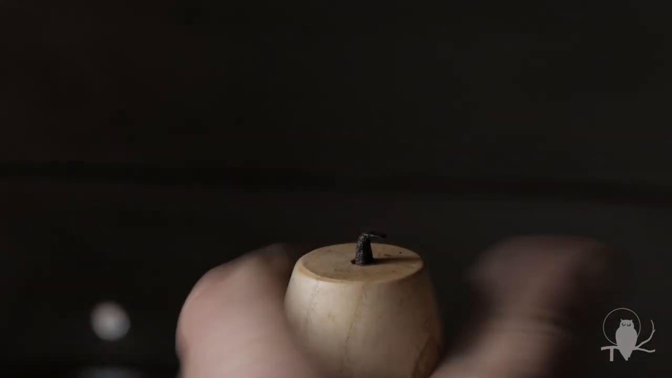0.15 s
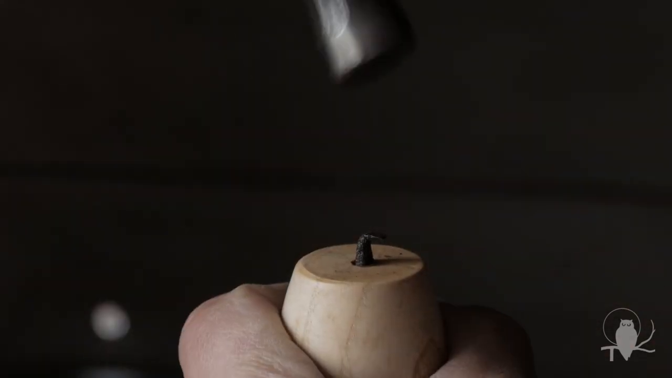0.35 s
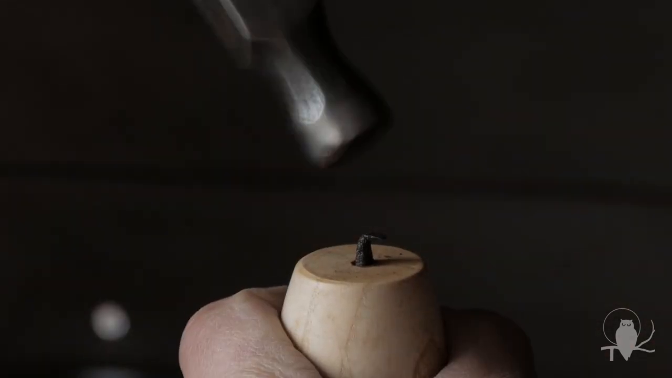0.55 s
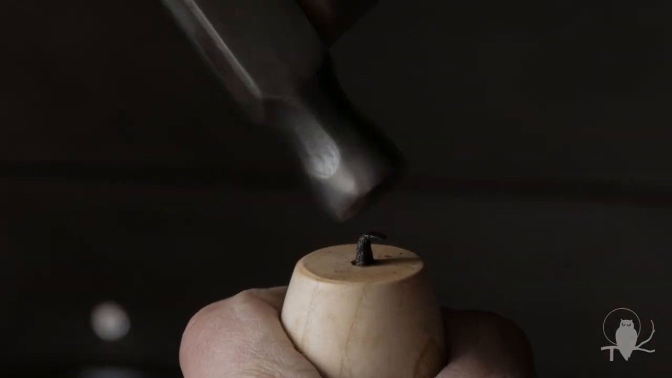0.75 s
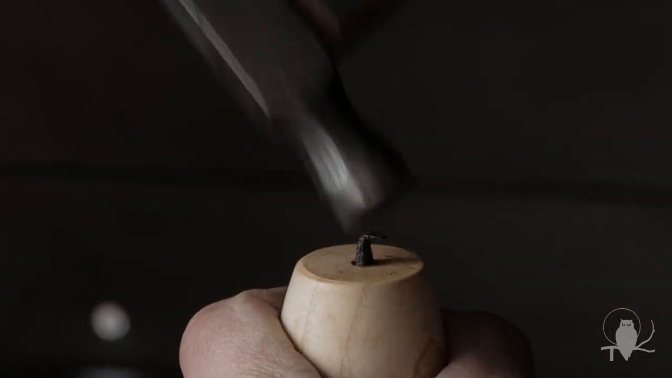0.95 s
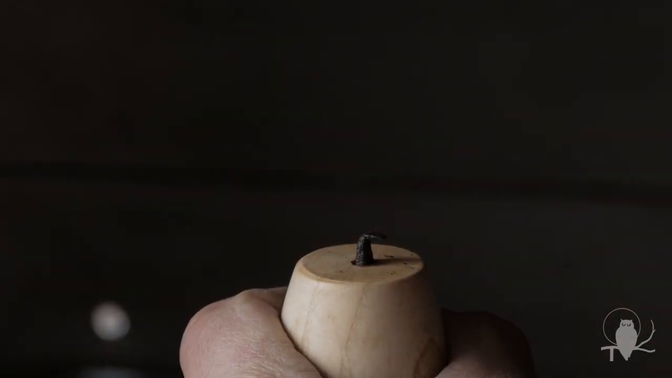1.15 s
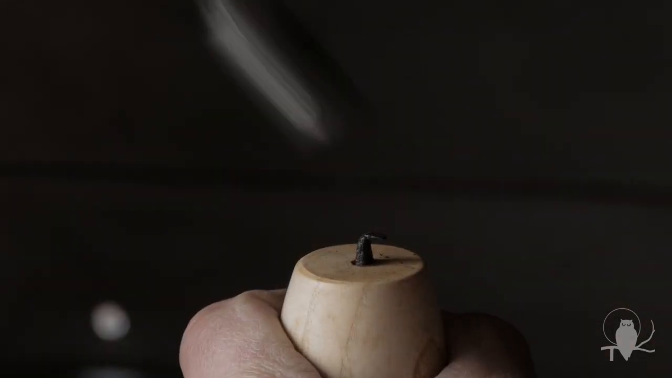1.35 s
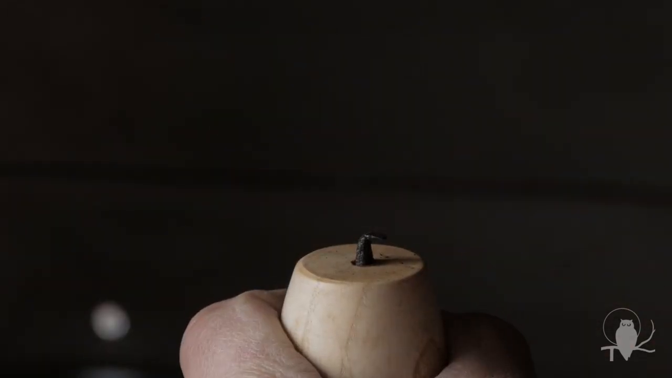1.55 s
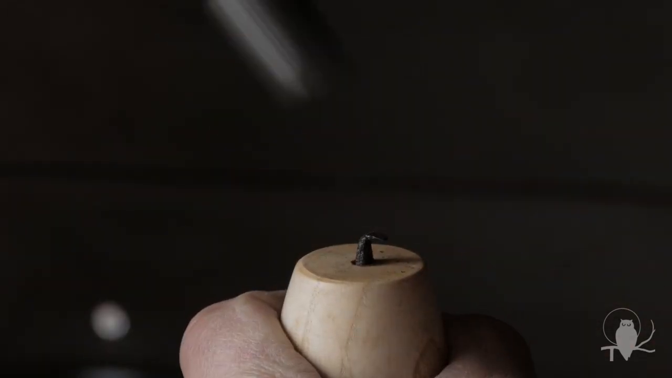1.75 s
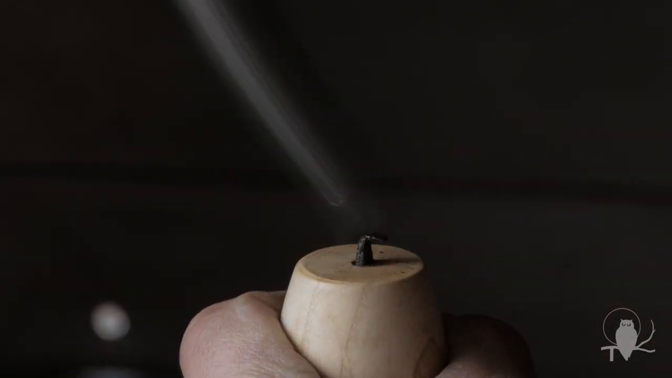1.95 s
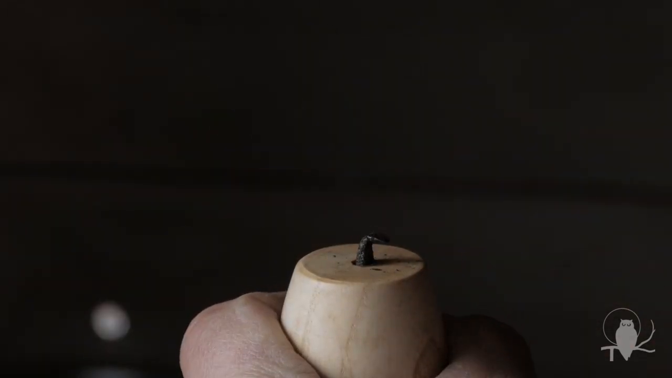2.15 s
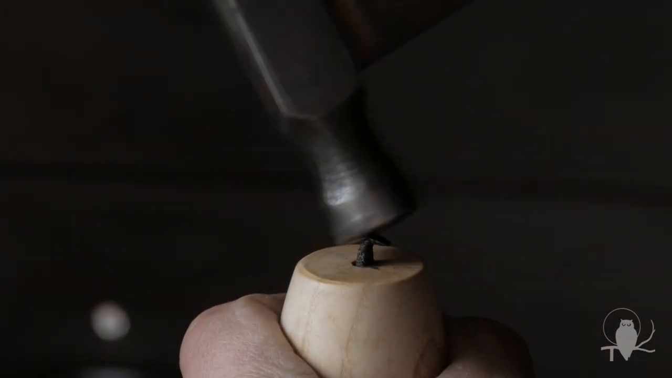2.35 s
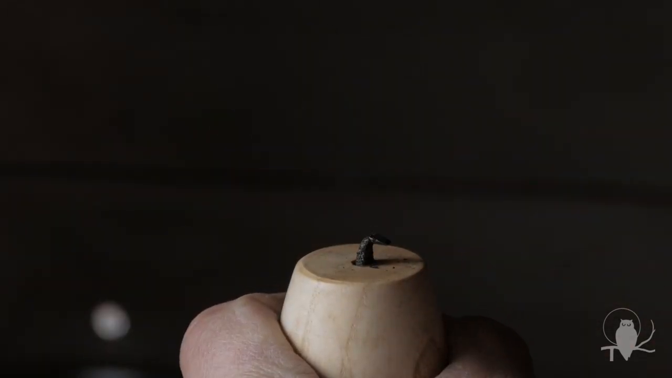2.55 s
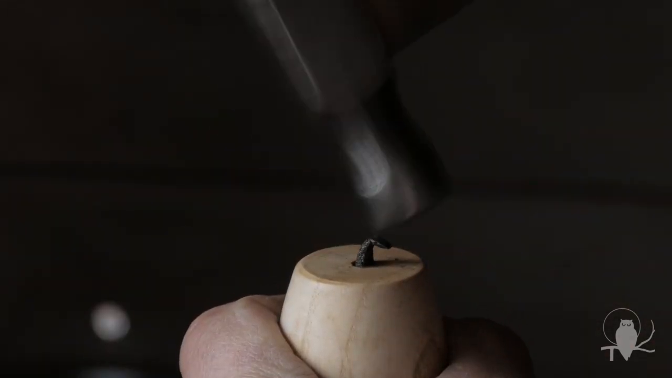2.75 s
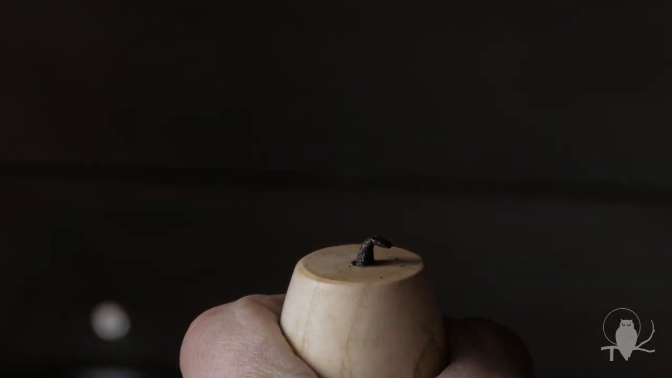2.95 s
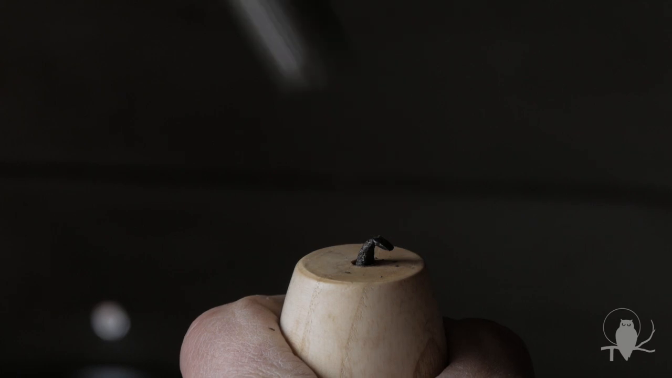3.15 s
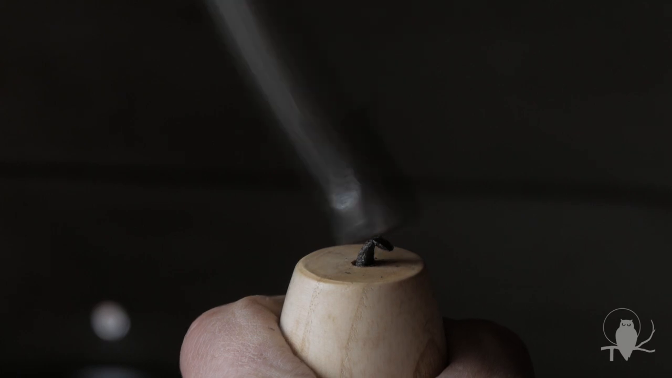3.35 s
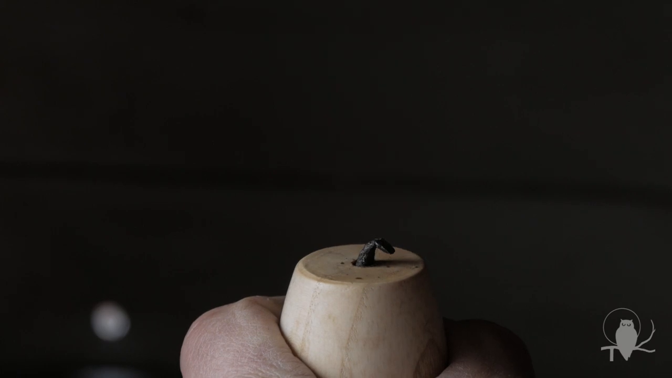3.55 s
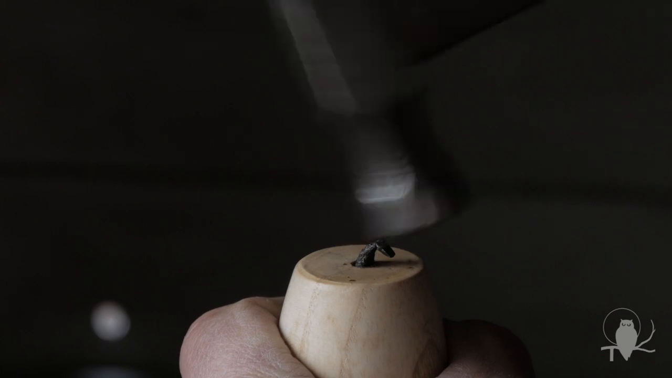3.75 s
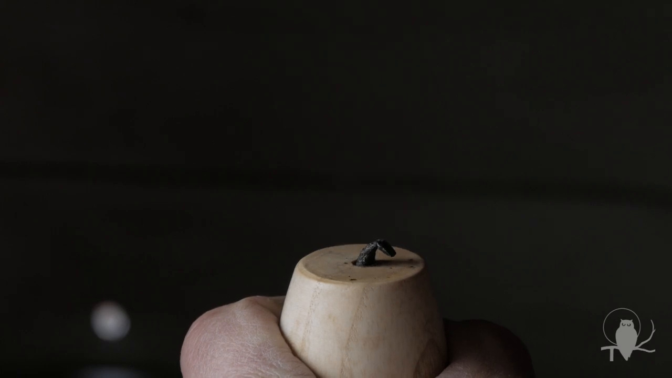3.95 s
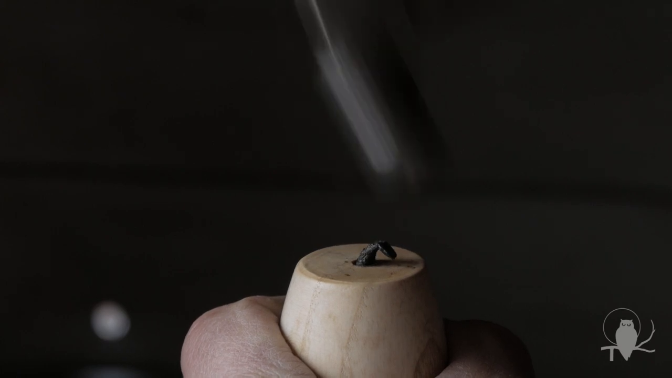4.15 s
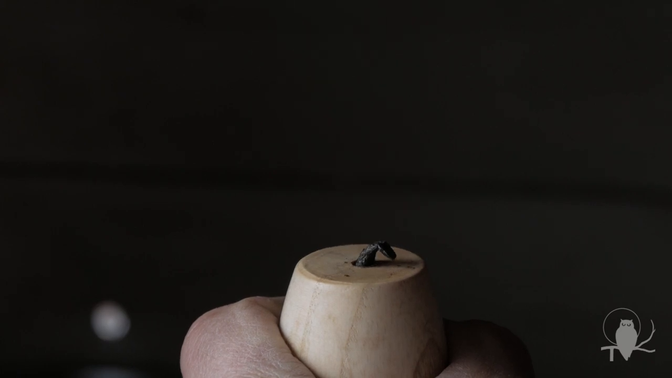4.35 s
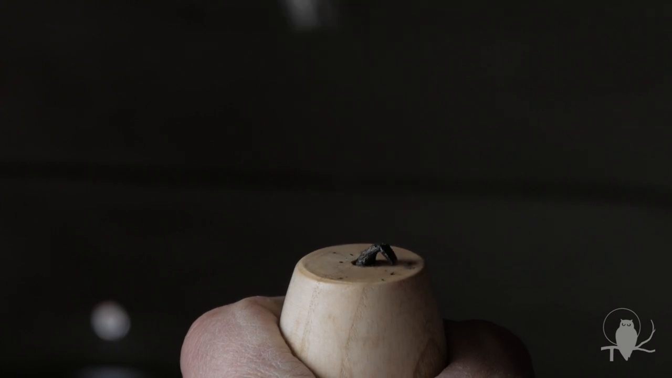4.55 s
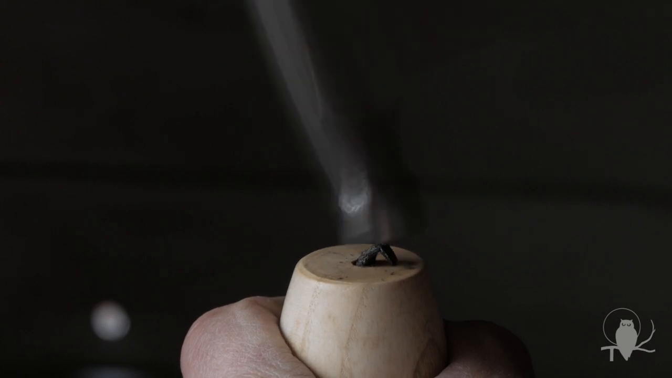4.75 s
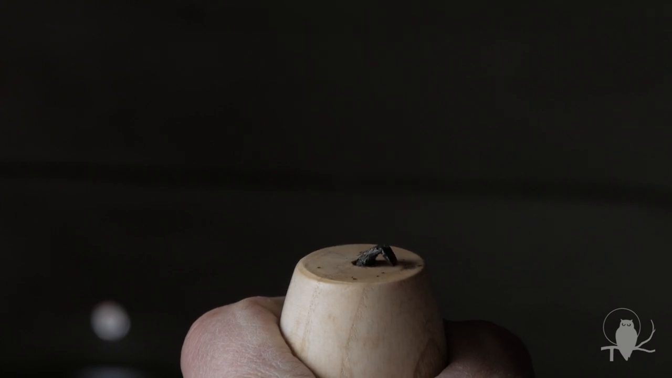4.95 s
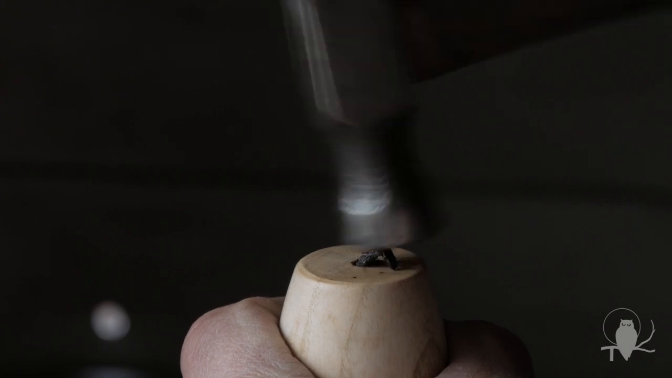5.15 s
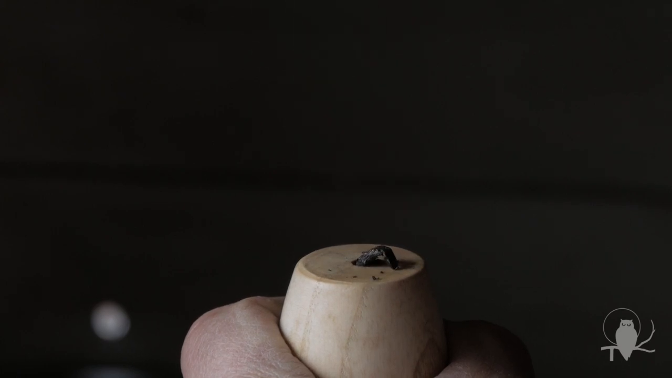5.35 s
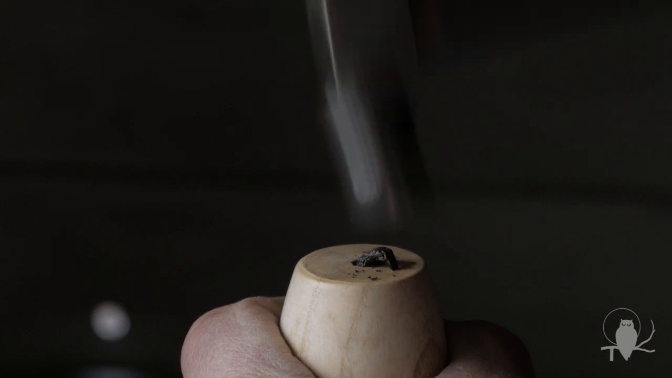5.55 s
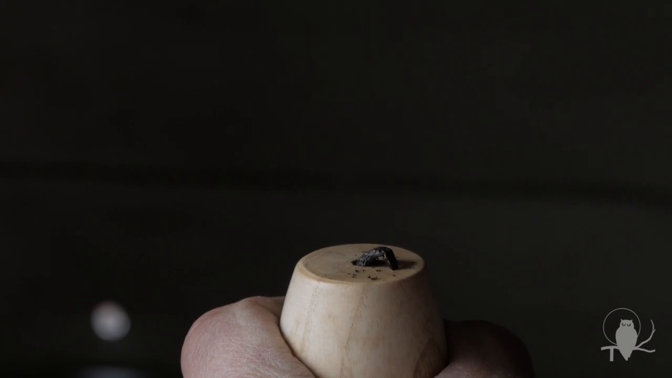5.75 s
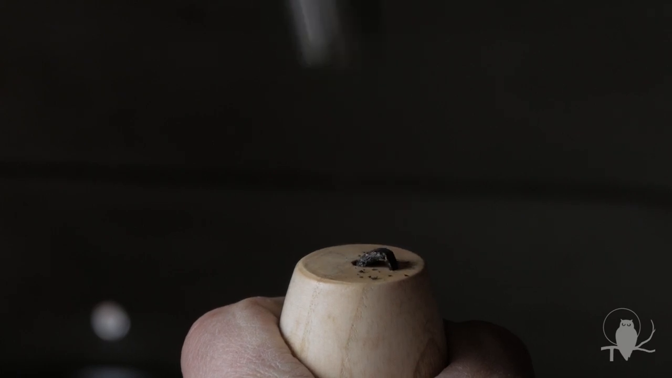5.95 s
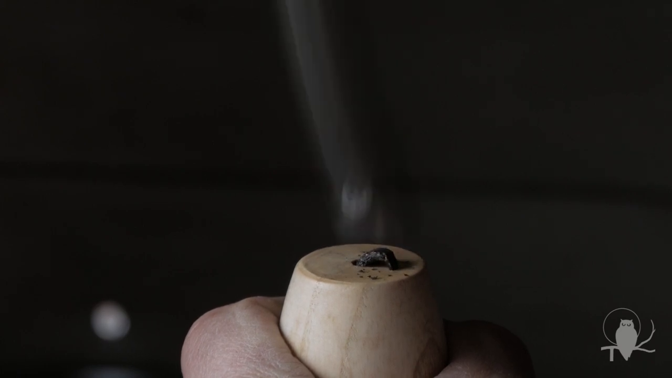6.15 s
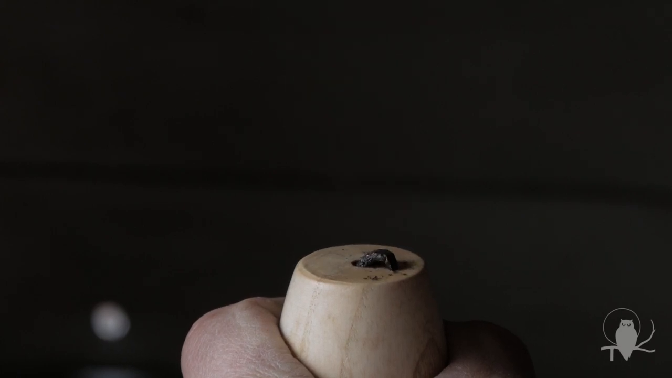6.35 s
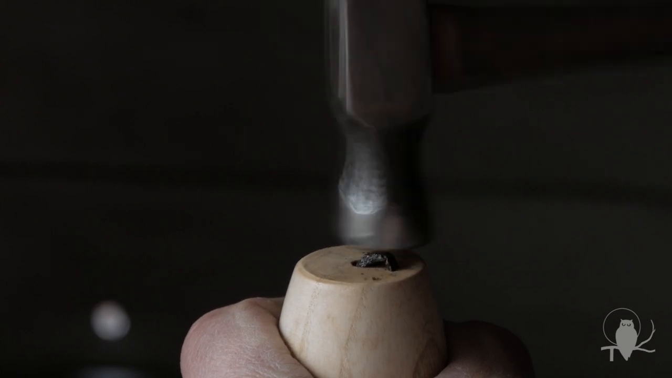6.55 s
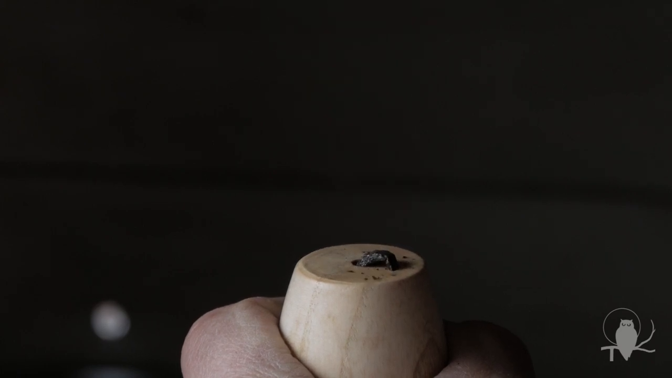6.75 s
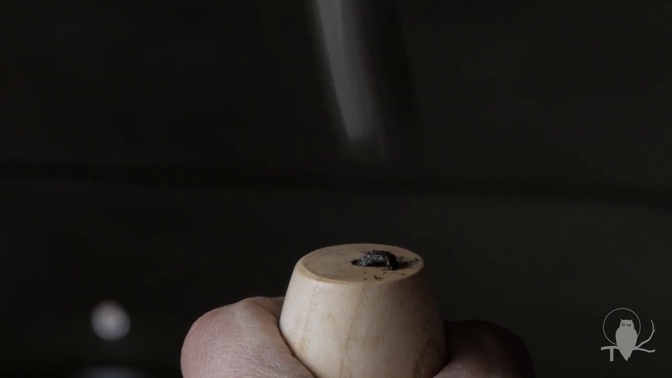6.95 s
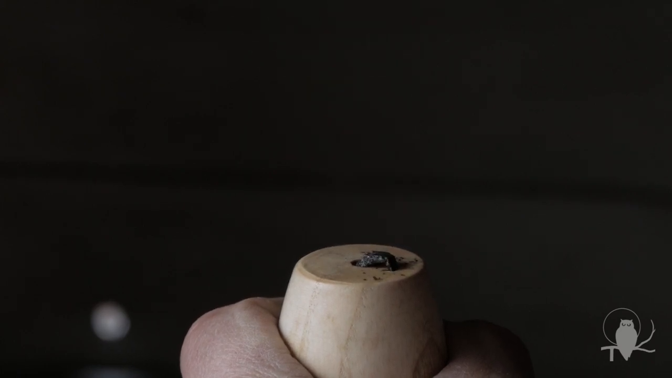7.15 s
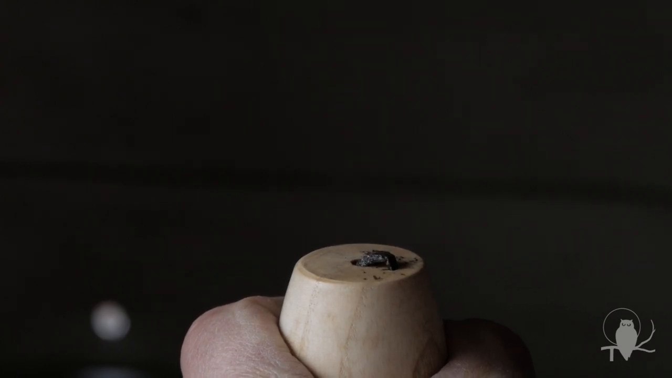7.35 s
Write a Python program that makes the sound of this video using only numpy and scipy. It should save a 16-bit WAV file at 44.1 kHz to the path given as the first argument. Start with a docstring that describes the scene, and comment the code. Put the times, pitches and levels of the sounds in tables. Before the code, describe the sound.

A wooden handle settles on a bench with a soft bump. Then a small hammer taps the steel tang poking through it, about three times a second, each blow a woody knock with a brief metallic ring. The taps slowly change tone as the tang flattens. They sound close, with short echoes from the walls of a small workshop, while birds whistle faintly outside over a low room hum.

```python
"""Hammering in a small workshop

A small hammer flattens a steel tang, the end of a tool that pokes through its wooden handle.
Every blow shakes the same steel, handle and bench and echoes off the same walls, so the taps
sound alike and change slowly as the tang flattens. Behind them are soft bumps, ticks and a rustle,
birds whistling faintly outside, and a low room hum."""
import sys
import numpy as np
from scipy import signal
from scipy.fft import rfft, irfft, next_fast_len
from scipy.io import wavfile
from scipy.ndimage import map_coordinates

SR = 44100
rng = np.random.default_rng(int(sys.argv[2]) if len(sys.argv) > 2 else 0)


def generate_wav(sig):
    """Save sig (samples, or channels by samples) to the path in sys.argv[1] as 16-bit PCM at SR."""
    pcm = np.round(np.clip(np.atleast_2d(sig).T, -1, 1) * 32767).astype(np.int16)
    wavfile.write(sys.argv[1], SR, pcm)


N = 326340

# Hammer blows (time [s], strength [dB], how flat it lands [0-1], sharpness [dB], thump [dB])
BLOWS = [(0.9254, -37, 0.71, -11.5, 3), (1.256, -26.5, 0.09, -5.5, 0), (1.6331, -25, 0, -4, 0.5),
         (1.9804, -25.5, 0, -0.5, 1), (2.3399, -25, 0.02, -1, -2.5), (2.6882, -23.5, 0, -2, -4.5),
         (3.0274, -24.5, 0.01, 0.5, -1.5), (3.3708, -24.5, 0, 0.5, -4), (3.7115, -26.5, 0.1, 1.5, -1),
         (4.066, -26.5, 0.21, 0.9, -2), (4.4133, -26, 0.2, 1.5, 1), (4.7684, -27.5, 0.5, 2, -3),
         (5.1272, -27, 0.6, -1.5, -4.5), (5.486, -28, 0.85, 0, -2), (5.8255, -28, 0.85, 0, -7),
         (6.1751, -27.5, 0.99, 3, -7.5), (6.5287, -26, 1, 2.5, -13), (6.8634, -25, 0.92, 2, -13.5)]
# The tone of a blow on the tip, and of a flat blow (frequency [Hz], boost [dB])
TIP_TONE = [(92, 5.5), (135, 1.5), (230, 1.5), (520, 6), (950, -1.5), (1400, -7.5), (2050, 5.5),
            (2350, 0.5), (2800, 2.5), (3800, -1.5), (9000, -6)]
FLAT_TONE = [(92, 6), (135, 1), (230, 8), (520, 7.5), (950, 4), (1400, 10), (2050, 2), (2350, 6),
             (2800, -1.5), (3800, -0.5), (9000, -8)]
# Where sharpness and bench thump change the tone (frequency [Hz], share [0-1])
SHARPNESS = [(1400, 0.0076), (2100, 0.46), (3800, .8), (9000, 1)]
THUMP = [(92, 0), (135, 0.88), (230, 0), (520, 0)]
def hammer():
    """Each blow rings wood and steel and stirs echoes; how it lands sets the tone."""
    out, t = np.zeros(N), np.arange(SR * 6 // 10) / SR
    echo_patterns = rng.standard_normal((2, len(t)))
    for start, db, flat, sharp_db, thump_db in BLOWS:
        early, late = wall_echoes(t, start, echo_patterns)
        tone_db = lambda hz: ((1 - flat) * along(TIP_TONE, hz) + flat * along(FLAT_TONE, hz)
                              + sharp_db * along(SHARPNESS, hz) + thump_db * along(THUMP, hz))
        tap = filtered(early + wood_ring(t) + tang_ring(t, flat), lambda hz: amp(tone_db(hz)))
        tap *= 1 - np.exp(-(t / .0021) ** 2)  # the soft tang gives way before it rings
        add(tap, .022, handle_bounce(tap, start))
        blow = amp(db) * (tap + late + head_ring(t, flat))
        add(out, start - .0017, blow)  # contact begins just before the sound peaks
    return out


# The notes of the bench, floor and handle (frequency [Hz])
WOOD_HZ = [93, 110, 131, 150, 168, 192, 208, 231, 252, 277, 298, 354, 390, 417, 456, 480, 526, 612, 654,
           692, 734, 822, 848, 892, 962, 1035, 1074, 1125, 1175]
# How each of them rings (level [dB], fade time [s])
WOOD_RINGS = [(1.5, 0.31), (-6, 0.24), (4.5, 0.38), (-3.5, 0.36), (-11, 0.61), (-5, .25), (1.5, 0.21),
              (-8.5, 0.027), (-7, 0.36), (-8, 0.2), (-5, .2), (-8, 0.12), (-12, 0.071), (-13, 0.062),
              (1, 0.12), (-9.5, 0.18), (-15, 0.23), (1, 0.12), (-8, 0.15), (-7.5, 0.03), (-23.5, 0.05),
              (-3.5, 0.081), (-2, 0.12), (-40, 0.16), (-19.5, 0.039), (-15.5, 0.085), (-11.5, 0.24),
              (-17, 0.16), (-19, 0.088)]
def wood_ring(t):
    """The wood shakes at many notes at once; the low ones come from the big boards and floor."""
    notes = np.c_[WOOD_HZ, WOOD_RINGS]
    is_low = notes[:, 0] < 330
    low = amp(-11) * ringing(notes[is_low], t, spread_db=2.4, rise=1.3, flip=0.95, lag=3.2)
    high = amp(-9) * ringing(notes[~is_low], t, spread_db=1, rise=3, flip=0.97)
    return low + high


# The notes of the tang and the top of the handle (frequency [Hz])
TANG_HZ = [1340, 1432, 1600, 1722, 1871, 1954, 1990, 2040, 2078, 2203, 2290, 2420, 2492, 2640, 2778, 2935,
           3112, 3380, 3590, 3925, 4247, 4440, 4830, 5040]
# How each of them rings (level [dB], fade time [s])
TANG_RINGS = [(-10, 0.14), (-12.5, 0.11), (-23, 0.037), (-13.5, 0.05), (-6.5, 0.13), (-4.5, 0.14),
              (-3.5, 0.086), (1, 0.046), (-6, 0.067), (-0.5, 0.071), (-3, 0.041), (-9.5, 0.041),
              (-20, 0.05), (-7.5, 0.068), (-7, 0.13), (-6.5, 0.11), (-16, 0.023), (-8.5, 0.11),
              (-18, 0.053), (-4, 0.081), (-7, 0.051), (-5.5, 0.015), (-11, 0.055), (-10, 0.12)]
def tang_ring(t, flat):
    """The struck steel rings; a hammer that lands flat cuts the upper notes short."""
    notes = np.c_[TANG_HZ, TANG_RINGS]
    is_upper = notes[:, 0] > 1500
    notes[:, 2] *= 1 - .45 * flat * is_upper
    return amp(-10.5 + 0.5 * flat) * ringing(notes, t, spread_db=2, rise=3.5, flip=-0.989)


# The hammer head's one high note (frequency [Hz], level [dB], fade time [s])
HEAD_NOTE = [(8856, 0, .14)]
def head_ring(t, flat):
    """The head rings out once it lands flat enough."""
    level_db = np.interp(flat, (.5, .75), (-52, -29))
    return amp(level_db) * ringing(HEAD_NOTE, t, spread_db=-4, rise=17, flip=1)


def handle_bounce(tap, start):
    """The handle jumps and lands with a thinner tap, louder once the tang is bent down."""
    bent_down_s, centre_hz, width_hz = 5.3, 1900, 1500
    band = lambda hz: 1j * hz * width_hz / (centre_hz ** 2 - hz ** 2 + 1j * hz * width_hz)
    return amp(-5 if start > bent_down_s else -22) * filtered(tap, band)


# The tone of the first echoes, and of the late ones (frequency [Hz], level [dB])
EARLY_TONE = [(60, -47), (150, -22.5), (350, -28), (600, -18), (1000, -16.5), (1330, -17), (1800, -18),
              (2100, -13.5), (2820, -16), (4950, -18.5), (5600, -23), (6300, -34), (8290, -28),
              (14600, -32), (16400, -47.5)]
LATE_TONE = [(60, -77), (105, -17), (300, -23), (600, -27), (1100, -36.5), (2000, -36), (5000, -46.5),
             (7000, -73), (16000, -86.5)]
# How long the first echoes last (frequency [Hz], fade time [s])
EARLY_FADE = [(60, 1), (160, 0.59), (420, 0.082), (1100, 0.12), (2900, 0.098), (7700, 0.093),
              (14000, 0.094)]
# How much of them is new at each blow (frequency [Hz], share [0-1])
NEW_SHARE = [(100, 0), (700, 0.35), (3000, 0), (9000, 0.1)]
def wall_echoes(t, start, patterns):
    """The walls answer with a quick knock, then a softer wash of late echoes."""
    turn = 0.15 * start  # the contact point wanders, and the echo pattern with it
    pattern = np.cos(turn) * patterns[0] + np.sin(turn) * patterns[1]
    kept = filtered(pattern, lambda hz: np.sqrt(1 - along(NEW_SHARE, hz)))
    new = filtered(noise(t), lambda hz: np.sqrt(along(NEW_SHARE, hz)))
    early = fading(kept + new, EARLY_TONE, EARLY_FADE) * (1 - np.exp(-t / 0.00043))
    late = fading(noise(t), LATE_TONE, [(100, 1.0), (3000, 0.36)]) * (1 - np.exp(-t / 0.015))
    return amp(-3) * early, amp(-22.5) * late


# Soft bumps, and small dry ticks (time [s], level [dB])
BUMPS = [(.002, -42), (.02, -41.5), (.036, -58)]
TICKS = [(3.908, -69.5), (6.441, -83)]
# The dull tone of a bump (frequency [Hz], level [dB])
BUMP_TONE = [(35, -56), (60, -22), (191, -0.5), (302, -16.5), (569, -1), (715, -14.5), (981, -16.5),
             (1810, -34.5), (4000, -46), (5200, -79), (8800, -120)]
def bumps_and_ticks():
    """The handle settles on the bench, wood on wood; later come two faint ticks."""
    out, t = np.zeros(N), np.arange(SR // 4) / SR
    soft_landing = 1 - np.exp(-(t / .004) ** 2)
    for start, db in BUMPS:
        bump = fading(noise(t), BUMP_TONE, [(100, .25), (600, .15), (3000, .1)])
        add(out, start, amp(db) * bump * soft_landing)
    tick_tone = [(600, -16), (2000, 6.5), (6000, -8), (12000, -22), (14000, -43)]
    for start, db in TICKS:
        add(out, start, amp(db - 3) * fading(noise(t), tick_tone, [(1000, 0.13)]))
    return out


# How loud the rustle is (time [s], level [dB])
RUSTLE_LEVEL = [(0, -86), (.2, -89), (.3, -110), (7.05, -110), (7.2, -86.5), (7.4, -87)]
# The tone of cloth (frequency [Hz], level [dB])
CLOTH_TONE = [(1500, -35.5), (3500, -6.5), (5500, -16), (7000, -24), (12500, -25), (14000, -49)]
def rustle(t):
    """A faint, grainy hiss of cloth at the start and the end."""
    grain = amp(1.8 * wobble(400, np.linspace(0, 399, N)))
    cloth = unit(grain * shaped(noise(t), CLOTH_TONE))
    return amp(along(RUSTLE_LEVEL, t, warp=np.asarray)) * cloth


# Bird whistles (time [s], length [s], first pitch [Hz], last pitch [Hz], bend in the middle [Hz],
# first level [dB], last level [dB], pitch flutter [Hz])
WHISTLES = [(0.022, 0.11, 2090, 2165, 27, -68, -71, 16), (.13, 0.094, 2165, 2165, 0, -82, -86, 13),
            (.185, .055, 2860, 3400, 550, -63, -82, 66), (.22, .065, 2530, 2720, 107, -61, -84, 30),
            (.28, .035, 2700, 2430, 0, -68, -77.5, 44), (.32, .05, 2560, 2450, 1, -72, -74, 37),
            (.52, .24, 1977, 1690, -110, -76.5, -94, 35), (.8, .11, 2370, 2280, 7, -78, -91, 61),
            (1.066, 0.19, 2660, 2780, 230, -79, -75.5, 62), (1.089, 0.21, 1960, 2040, 31, -87, -79, 45),
            (1.3, .24, 2346, 2126, -86, -70, -78.5, 14), (1.55, .08, 2165, 2110, 0.5, -85, -81.5, 21),
            (2.418, 0.11, 3960, 3650, 88, -74, -81, 68), (2.498, 0.093, 3790, 3900, 33, -78, -85, 35),
            (2.6, 0.073, 6600, 5950, -1, -102, -95, 56), (2.828, .13, 4900, 4620, 35.5, -88, -85, 58),
            (2.96, 0.074, 5000, 4950, 7, -88, -86, 69), (3.31, 0.07, 4030, 3960, -2, -86.5, -83.5, 56),
            (5.6, .25, 2330, 2430, 21, -93, -82, 34), (6.0, 0.18, 2070, 2186, 5.5, -91.5, -83, 47),
            (6.308, 0.18, 2050, 2150, 11, -82.5, -83.5, 123),
            (6.67, 0.2, 2926, 2990, 28.5, -89.5, -84.5, 55)]
def birds():
    """Raspy, sliding whistles and a trill, blurred by outdoor echoes."""
    out = trill()
    for start, length, from_hz, to_hz, bend_hz, flutter_hz, first_db, last_db in (
            row[:5] + (row[7],) + row[5:7] for row in map(tuple, WHISTLES)):
        t = np.arange(0, length, 1 / SR)
        progress = t / length
        soft_ends = np.clip(np.minimum(t, length - t) / 0.027, 0, 1)
        flicker = amp(3.5 * wobble(60, t * 70))  # moving air makes the level flicker
        pitch = from_hz + (to_hz - from_hz) * progress + bend_hz * np.sin(np.pi * progress)
        pitch += flutter_hz * wobble(200, t * 180)
        level = amp(first_db + (last_db - first_db) * progress)
        add(out, start, level * soft_ends * flicker * whistle(pitch))
    t = np.arange(SR // 5) / SR
    echo = noise(t) * amp(-60 * t / 0.18)
    return amp(-5) * out + amp(-3) * signal.fftconvolve(out, echo / np.linalg.norm(echo))[:N]


# How loud the trill is (time [s], level [dB])
TRILL_LEVEL = [(4.1, -92), (4.4, -89), (4.77, -89.5)]
def trill():
    """A far bird chirps about 13 times a second, each chirp dropping onto a held note."""
    out, t = np.zeros(N), np.arange(TRILL_LEVEL[0][0], TRILL_LEVEL[-1][0], 1 / SR)
    progress = (t - 4.29) * 12.9 % 1  # runs from 0 to 1 in each chirp
    pitch = 4240 + 950 * np.exp(-(progress / .24) ** 6) + 100 * wobble(200, (t - t[0]) * 200)
    pulses = np.sin(np.pi * np.clip(progress / .9, 0, 1)) ** 0.4
    add(out, t[0], amp(along(TRILL_LEVEL, t)) * pulses * whistle(pitch))
    return out


# The tone of the room's hum (frequency [Hz], level [dB])
HUM_TONE = [(15, -51.5), (25, -4), (97, -16), (114, 6.5), (138, -2.5), (154, -0.5), (409, -14),
            (649, -10.5), (763, -18.5), (828, -12.5), (1590, -24.5), (1920, -22), (4960, -38), (5530, -45),
            (16400, -50.5)]
# How its loudness drifts (time [s], change [dB])
HUM_DRIFT = [(0.0, 3), (7.4, -2.5)]
def room_hum(t):
    """A low wash of noise that slowly gets quieter."""
    drift_db = along(HUM_DRIFT, t, warp=np.asarray)
    return amp(-72 + drift_db) * unit(shaped(noise(t), HUM_TONE))


def amp(db):
    return 10 ** (np.asarray(db) / 20)


def unit(x):
    return x / np.sqrt(np.mean(x ** 2) + 1e-20)


def noise(t):
    return rng.standard_normal(len(t))


def wobble(count, at):
    """A smooth curve through count random values."""
    return map_coordinates(rng.standard_normal(count), [at])


def whistle(pitch):
    """A pure tone that follows a pitch in Hz."""
    return np.sqrt(2) * np.sin(2 * np.pi * np.cumsum(pitch) / SR)


def along(points, at, warp=np.log1p):
    """Reads between a table's rows, on a log scale by default."""
    places, values = np.transpose(points)
    return np.interp(warp(at), warp(places), values)


def filtered(x, response):
    """Turns each frequency up or down by response(hz)."""
    size = next_fast_len(x.shape[-1] + 8192)
    return irfft(rfft(x, size) * response(np.fft.rfftfreq(size, 1 / SR)), size)[..., :x.shape[-1]]


def shaped(x, tone):
    """Gives a sound the tone in a table."""
    return filtered(x, lambda hz: amp(along(tone, hz)))


def add(track, start, sound):
    """Mixes a sound in at start seconds."""
    part = track[round(start * SR):][:len(sound)]
    part += sound[:len(part)]


def ringing(notes, t, spread_db, rise, flip, lag=0):
    """Slightly uneven notes that swell over rise cycles and drop 60 dB in their fade time."""
    hz, db, fade_s = np.transpose(notes)[:, :, None]
    uneven_db = rng.normal(0, 1, hz.shape) * spread_db
    sign = flip ** np.arange(len(hz))[:, None]  # below zero, neighbours swing opposite ways
    level = amp(db + uneven_db - 60 * t / fade_s) * (1 - np.exp(-t * hz / rise))
    waves = np.sin(2 * np.pi * (hz * t - lag * np.log(hz)))  # lag makes low notes peak last
    return np.sum(sign * level * waves, axis=0)


def fading(hiss, tone, fade_times):
    """Shaped noise in which each frequency fades at its own speed."""
    hz, t, bands = signal.stft(unit(shaped(hiss, tone)), SR, nperseg=256)
    bands *= amp(-60 * t / along(fade_times, hz)[:, None])
    return signal.istft(bands, SR, nperseg=256)[1][:len(hiss)]


def scene():
    """The work at the bench, with birds and hum behind it."""
    t = np.arange(N) / SR
    work = hammer() + bumps_and_ticks() + rustle(t)
    # the deepest lows, below about 70 Hz, are turned down
    low_cut = lambda hz: (1j * hz / (70 + 1j * hz)) ** 2
    return (filtered(work, low_cut) + birds() + room_hum(t))[None]


def record(dry):
    """Removes the very highest treble."""
    return filtered(dry, lambda hz: hz < 16400)


dry = scene()
out = record(dry)
generate_wav(out)
```